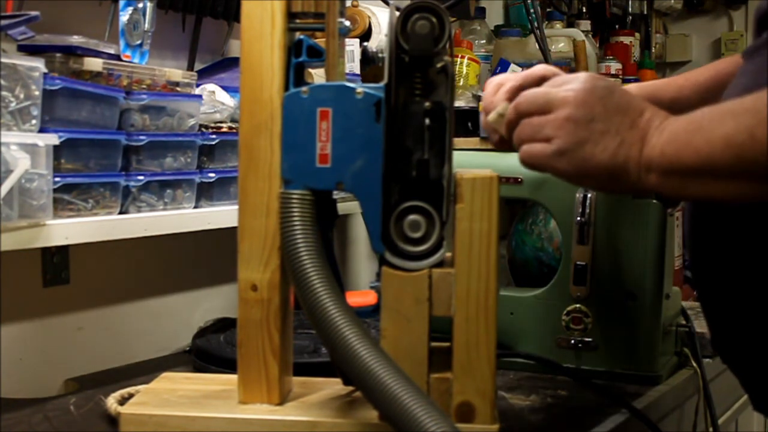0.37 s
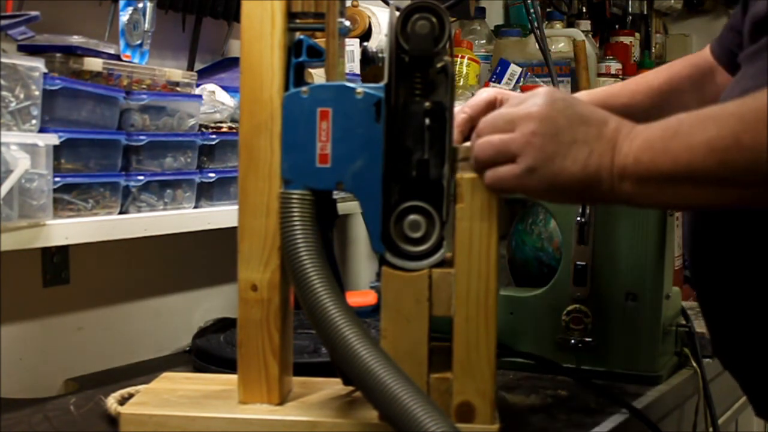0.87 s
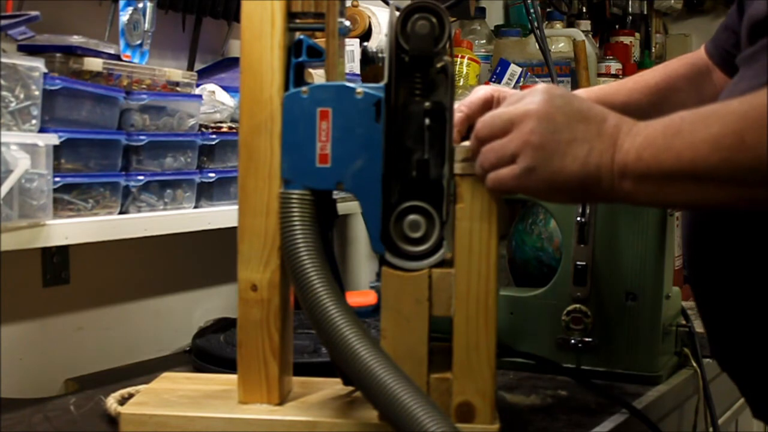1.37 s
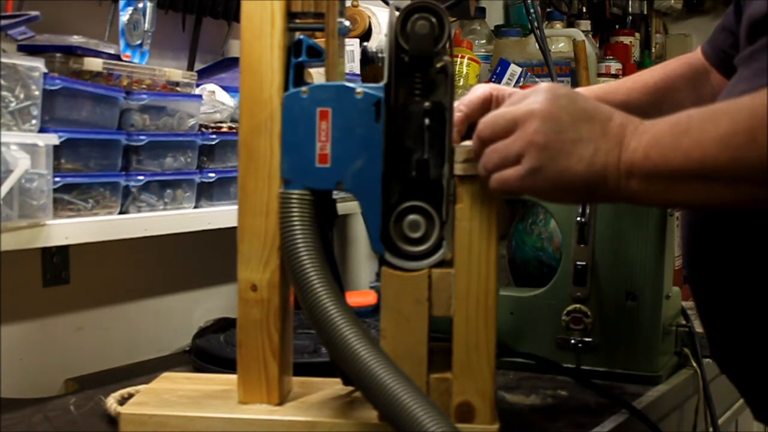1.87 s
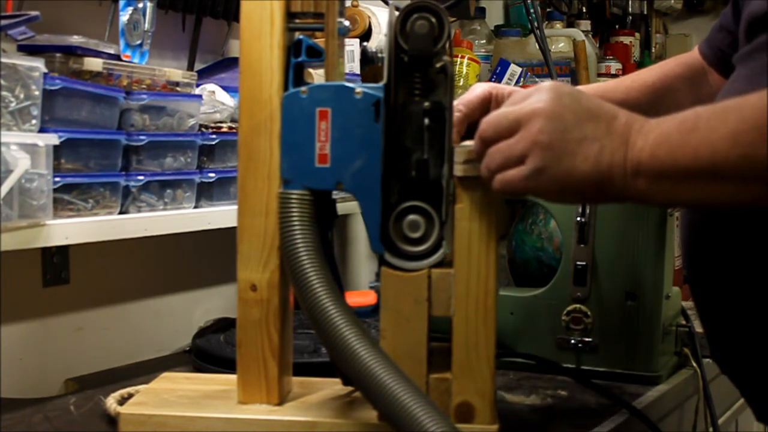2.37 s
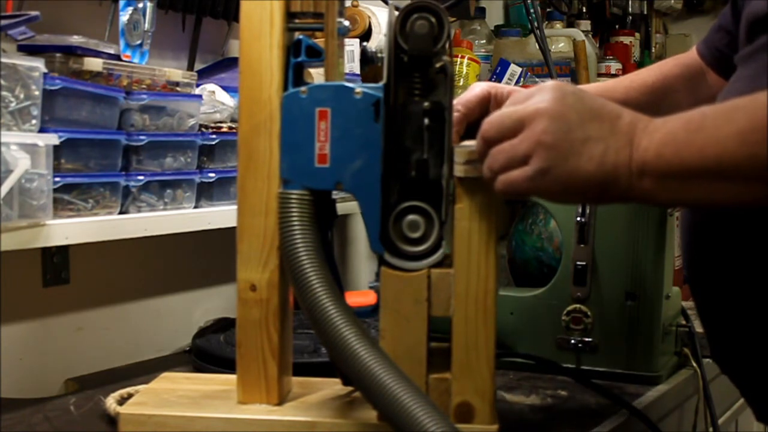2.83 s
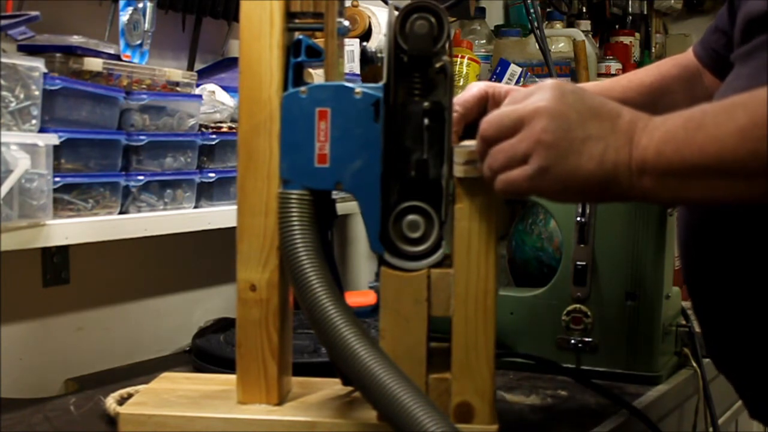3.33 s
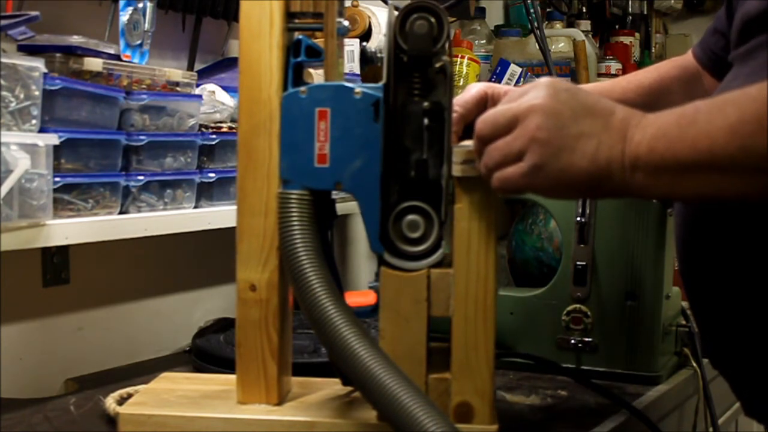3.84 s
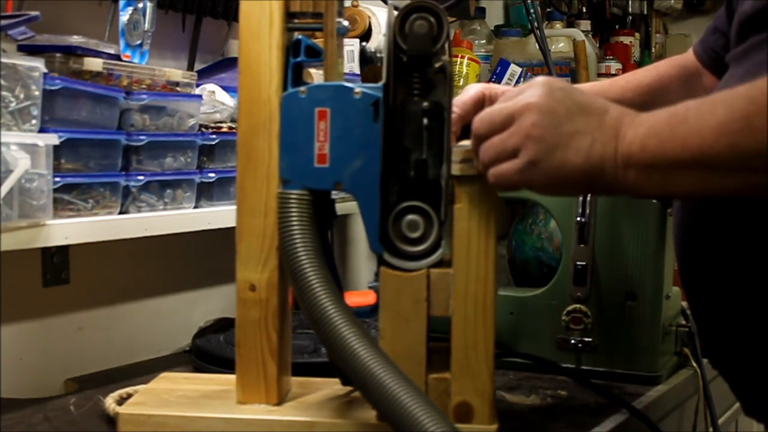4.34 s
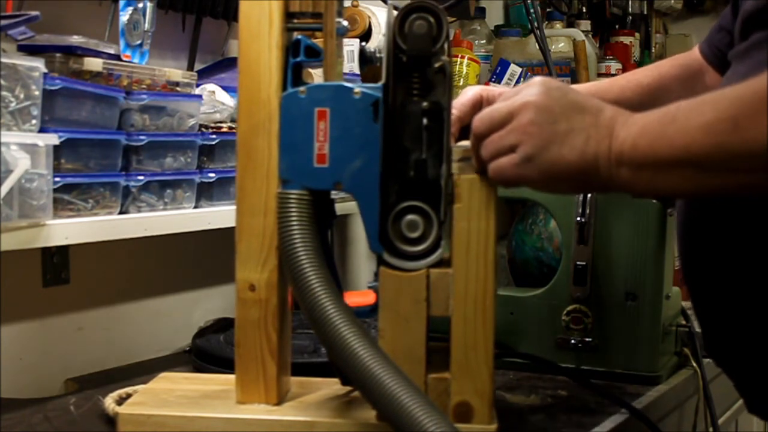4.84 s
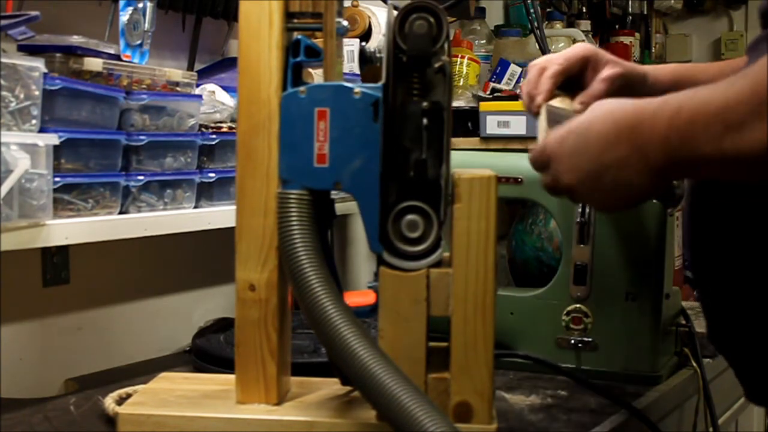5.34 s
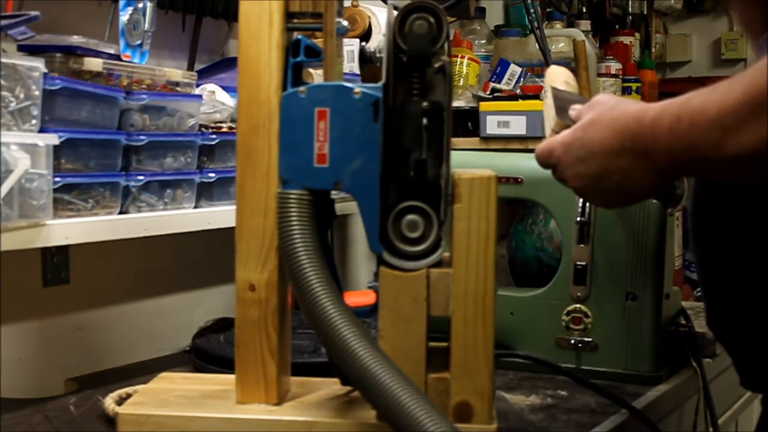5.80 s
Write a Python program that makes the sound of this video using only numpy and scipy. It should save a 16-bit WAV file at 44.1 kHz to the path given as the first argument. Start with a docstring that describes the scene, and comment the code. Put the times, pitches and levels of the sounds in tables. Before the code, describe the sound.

A belt sander is already running at full speed, heard close and centred, the same on both sides. A piercing fan whine a little above 4 kHz, with fainter overtones, gear whirr and pulley hum, sits over a thick, bright rush of cooling air and moving belt. At about 0.9 s a block of wood touches lightly, with a thin, high scratch until about 1.3 s; then a broader gritty rasp grows, and every motor tone slides slightly down. The scratching eases around 3 s and the pitch lifts a touch, then heavier pressing from 3.5 to 4.8 s drags it to its lowest, about six percent below idle, with a faint deep rumble swelling. From about 4.85 s the wood comes away: the rasp fades, and the whine climbs fast, then more gently, back to its free-running pitch by 5.8 s. The machine keeps running to the end.

```python
"""A belt sander clamped upright in a small workshop first runs free: fan whine, gear and pulley tones come from
the turning of its motor, over the rush of cooling air and the belt. A block of wood touches the belt lightly
and scratches high, then is pressed on. The load slows the motor, so all its tones sag together while filtered
noise makes the scratching grit, and a low rumble swells. The wood is lifted and the tones climb back.
Both channels are given the same sound."""
import sys
import numpy as np
from scipy import signal
from scipy.fft import rfft, irfft, next_fast_len
from scipy.io import wavfile
from scipy.ndimage import uniform_filter1d, map_coordinates

SR = 44100
rng = np.random.default_rng(int(sys.argv[2]) if len(sys.argv) > 2 else 0)


def digitize_waveform(pressure):
    """Quantize a signal to 16-bit integers and store it at the path in sys.argv[1].

    Rows of a 2-D input are taken as channels; values are limited to [-1, 1].
    """
    field = np.atleast_2d(pressure).T
    bounded = np.clip(field, -1, 1)
    quanta = np.round(bounded * 32767).astype(np.int16)
    wavfile.write(sys.argv[1], SR, quanta)


def amplitude_ratio(level_db):
    """Convert a level in decibels to the matching linear amplitude (field) ratio."""
    exponent = np.asarray(level_db, float) / 20
    return 10 ** exponent


N = 261950  # length in samples

BLADES = 12  # fan blades, so cycles of the fan tone per motor turn
PULLEY, MESH, WHISTLE = .2837, 5.248, 8.555  # cycles per motor turn at idle


def unit(x):
    """Scales a sound to an rms (average strength) of 1."""
    return x / np.sqrt(np.mean(x ** 2) + 1e-20)


def curves(rows):
    """Joins the rows by straight lines: one value per sample for each column after the time in seconds."""
    s, *columns = np.transpose(rows)
    return [np.interp(np.arange(N) / SR, s, column) for column in columns]


def wobble(rate):
    """A smooth random curve through `rate` random points a second."""
    points = rng.standard_normal(int(N * rate / SR) + 4)
    return map_coordinates(points, [np.arange(N) * rate / SR])


def noise(gain, patchy_db):
    """Noise of rms 1, coloured by a gain per frequency, with slow patches of random level."""
    _, _, cells = signal.stft(rng.standard_normal(N + 2048), SR, nperseg=1024)
    field = uniform_filter1d(rng.standard_normal(cells.shape), size=8, axis=0)  # smooth over frequency
    field = uniform_filter1d(field, size=24, axis=1)  # smooth over time
    patchy = signal.istft(cells * amplitude_ratio(patchy_db * unit(field)), nperseg=1024)[1][:N]
    m = next_fast_len(N)
    spectrum = rfft(patchy, m) * gain(np.fft.rfftfreq(m, 1 / SR))
    return unit(irfft(spectrum, m)[:N])


def tone(turns, order, db, shake):
    """A sine locked to an angle in turns; shake scales a random unsteadiness of its phase, in radians."""
    phase = 2 * np.pi * (order * turns + rng.random()) + shake * wobble(25)
    return np.sqrt(2) * amplitude_ratio(db) * np.sin(phase)


def heard(points, hz):
    """Level in dB of a tone at its present pitch: standing waves make some pitches louder than others."""
    settle_s = .04  # the standing waves need this long to follow a new pitch
    return uniform_filter1d(np.interp(hz, *np.transpose(points)), size=round(settle_s * SR))


def motor_speed():
    """The load slows the motor; the drive belt slips a little, so the pulley side slows slightly more."""
    # Motor speed, given as the pitch of the fan. Each row: time in seconds, fan tone in Hz.
    speed = [(0.0, 4322.1), (0.8, 4326.7), (0.88, 4318.7), (0.96, 4305.7), (1.08, 4274.6), (1.2, 4256.1),
             (1.4, 4236.7), (1.7, 4221.3), (2.0, 4199.8), (2.3, 4170.0), (2.5, 4165.5), (2.62, 4166.5),
             (2.75, 4175.9), (2.95, 4175.4), (3.2, 4189.3), (3.38, 4188.3), (3.55, 4169.9), (4.0, 4103.2),
             (4.25, 4085.7), (4.48, 4048.0), (4.6, 4043.0), (4.78, 4052.5), (4.85, 4076.9), (5.05, 4204.8),
             (5.2, 4258.0), (5.35, 4291.8), (5.6, 4318.1), (5.8, 4329.2), (5.94, 4331.3)]
    idle_hz = 4326  # fan tone without load
    creep = .065  # share of pulley speed lost to slip, per share of motor speed lost
    blade_hz, = curves(speed)
    sag = np.clip(1 - blade_hz / idle_hz, 0, 1)  # share of motor speed lost
    shaft_hz = blade_hz / BLADES
    belt_hz = shaft_hz * (1 - creep * sag)
    return shaft_hz, belt_hz, sag


def fan(shaft_hz, turns):
    """The blades chop the air: a tone at the blade rate and two harmonics above it."""
    # The three tones as heard through the standing waves. Each row: pitch in Hz, level in dB.
    blade_1 = [(4044, -24), (4075, -23.5), (4092, -19.5), (4104, -19), (4118, -22.5), (4134, -19),
               (4148, -24), (4163, -18), (4172, -19), (4178, -23.5), (4184, -29), (4190, -27), (4197, -20),
               (4228, -19.5), (4237, -27), (4248, -19.5), (4270, -18.5), (4291, -33), (4310, -26.5),
               (4328, -22)]
    blade_2 = [(8088, -42.5), (8150, -34.5), (8250, -25.0), (8330, -31.5), (8380, -33.5), (8400, -34.5),
               (8420, -28.5), (8450, -31.0), (8490, -40.5), (8550, -41.5), (8610, -33.0), (8660, -33.0)]
    blade_3 = [(12132, -35.5), (12204, -32.5), (12324, -36.0), (12468, -35.5), (12560, -34.0),
               (12620, -32.5), (12700, -27.0), (12800, -34.0), (12880, -34.0), (12990, -39.5)]
    # Level change of each tone while hands and block move in front of the machine.
    # Each row: time in seconds, change in dB.
    hands_1 = [(0, 1.0), (0.12, 2.0), (0.42, -1.0), (0.65, 2.5), (0.9, 0.0), (4.85, 0.0), (4.95, -1.5),
               (5.05, 0.0), (5.2, -4.0), (5.45, 5.0), (5.62, -2.0), (5.72, -1.0), (5.8, -6.0), (5.94, 2.0)]
    hands_2 = [(0.15, 2), (.5, 4), (.9, 1), (5.2, -1), (5.5, 3.5), (5.7, 1), (5.94, 2)]
    hands_3 = [(0, 2.5), (.2, 6.5), (.5, 1), (.75, 12), (.9, 1), (4.85, -1), (5, -3), (5.5, 7), (5.94, 6)]
    # the last number sets how unsteady the level is, in dB
    blades = [(blade_1, hands_1, .3), (blade_2, hands_2, 1.3), (blade_3, hands_3, 1.8)]
    whine = np.zeros(N)
    for harmonic, (points, hands, unsteady_db) in enumerate(blades, start=1):
        order = harmonic * BLADES
        db = heard(points, order * shaft_hz) + curves(hands)[0]
        db = db + unsteady_db * wobble(9) + 1.13 * wobble(18)
        whine += tone(turns, order, db, shake=0.076)
    return whine


def shaft_and_pulley(shaft_hz, belt_hz, turns, belt_turns):
    """Stronger tones at fixed multiples of the shaft's turning, and others that follow the slipping belt."""
    # Tones of the shaft, then of the belt side. Each key is the cycles per turn.
    # Each row under it: pitch in Hz, level in dB.
    shaft_heard = {1: [(345, -52.5), (355, -51.5), (361, -47)], 2: [(690, -60), (702, -44), (712, -50.5),
                   (721, -46)], WHISTLE: [(2883, -40), (2923, -34), (2940, -50), (2957, -41), (2997, -48),
                   (3026, -38), (3083, -42)], 14: [(4718, -44), (4755, -52), (4830, -36), (4895, -38),
                   (4914, -47), (4998, -39), (5045, -40)]}
    belt_heard = {4 * PULLEY: [(382, -44), (391, -42.5), (404, -40.5), (407, -42), (409, -51)],
                  5 * PULLEY: [(478, -38.5), (485, -43), (489, -56), (496, -49), (504, -40.5), (511, -42)],
                  8 * PULLEY: [(790, -57), (810, -55), (818, -43)], 12 * PULLEY: [(1180, -55), (1210, -46),
                  (1227, -39.5)], 3 * MESH: [(5290, -32), (5340, -44), (5430, -43), (5480, -48),
                  (5530, -40), (5600, -34), (5670, -39)], 13 * PULLEY: [(1242, -42), (1255, -53),
                  (1260, -41), (1282, -36), (1297, -43), (1301, -49), (1328, -36.5)],
                  MESH - PULLEY: [(1670, -59), (1700, -44), (1740, -41), (1770, -38), (1788, -43)]}
    hum = np.zeros(N)
    for order, points in shaft_heard.items():
        db = heard(points, order * shaft_hz) + 1.7 * wobble(6)
        hum += tone(turns, order, db, shake=0.27)
    for order, points in belt_heard.items():
        db = heard(points, order * belt_hz) + .9 * wobble(6)
        hum += tone(belt_turns, order, db, shake=0.12)
    return hum


def gears(belt_hz, sag, turns, belt_turns):
    """Meshing teeth make a tone and its 2nd harmonic; a close neighbour beats with the latter when unloaded."""
    # The mesh tone and its 2nd harmonic as heard. Each row: pitch in Hz, level in dB.
    mesh_1 = [(1760, -28.5), (1775, -30), (1783, -34), (1792, -43), (1800, -34), (1809, -29.5), (1818, -37),
              (1830, -36), (1842, -35), (1852, -45), (1877, -38), (1893, -38.5)]
    mesh_2 = [(3520, -37.5), (3560, -40.0), (3590, -42.0), (3620, -32.5), (3640, -32.5), (3660, -36.0),
              (3680, -29.0), (3700, -31.0), (3720, -33.5), (3765, -31.0), (3788, -32.5)]
    # Level change of the 2nd harmonic, which drops while the freed motor speeds up.
    # Each row: time in seconds, change in dB.
    mesh_2_level = [(0, -1.5), (.4, -8), (.8, -4), (.9, 0.5), (4.85, 0.5), (5.1, -12), (5.25, -6), (5.4, 0),
                    (5.94, 2)]
    # The neighbour tone: cycles per motor turn, level in dB, share of speed lost that silences it.
    flutter = (10.6, -34, .012)
    change_db, = curves(mesh_2_level)
    first_db = heard(mesh_1, MESH * belt_hz) + 1.1 * wobble(7)
    first = tone(belt_turns, MESH, first_db, shake=.15)
    second_db = heard(mesh_2, 2 * MESH * belt_hz) + change_db + 0.89 * wobble(6.5)
    second = tone(belt_turns, 2 * MESH, second_db, shake=.1)
    order, flutter_db, quiet_sag = flutter
    unloaded = np.clip(1 - sag / quiet_sag, 0, 1)
    neighbour = unloaded * tone(turns, order, flutter_db + change_db + 1.5 * wobble(4), shake=.3)
    return first + second + neighbour


def weak_tones(turns, belt_turns):
    """Weaker tones of shaft, pulley and gears that come and go."""
    # Shaft tones. Each entry: cycles per motor turn, level in dB.
    shaft_tones = {8: -50, 13: -55, 28: -50, 42: -54}
    # Pulley tones. Each entry: multiple of the pulley's turning, level in dB.
    pulley_tones = {1: -65.5, 6: -48.5, 7: -51.5, 9: -51, 10: -48, 11: -47.5, 14: -52, 17: -48.5}
    # Mesh tones shifted by pulley turns. Each entry: mesh multiple and pulley turns, level in dB.
    sidebands = {(1, 1): -50, (1, 2): -47.5, (2, -3): -41, (2, -2): -40, (2, -1): -42, (2, 1): -49, (2, 2): -43, (3, -2): -43}
    weak = [(turns, k, db) for k, db in shaft_tones.items()]
    weak += [(belt_turns, k * PULLEY, db) for k, db in pulley_tones.items()]
    weak += [(belt_turns, m * MESH + k * PULLEY, db) for (m, k), db in sidebands.items()]
    return sum(tone(angle, order, db + 3 * wobble(2.48), shake=0.26) for angle, order, db in weak)


def motor():
    """Fan, gears and pulley all follow the one motor, so their tones sag and recover together."""
    shaft_hz, belt_hz, sag = motor_speed()
    turns = np.cumsum(shaft_hz) / SR
    belt_turns = np.cumsum(belt_hz) / SR
    drive = shaft_and_pulley(shaft_hz, belt_hz, turns, belt_turns) + gears(belt_hz, sag, turns, belt_turns)
    return fan(shaft_hz, turns) + drive + weak_tones(turns, belt_turns)


def sanding():
    """Grit scratching the wood excites one broad ring of the block, and a narrower one at first touch."""
    # Strength of the scratching. Each row: time in seconds, level in dB.
    grit = [(0, -50), (.8, -50), (1.1, -41), (1.6, -31), (2.3, -31), (3, -37), (3.6, -32), (4, -27.5),
            (4.7, -28), (4.9, -38), (5.2, -50), (5.94, -50)]
    # Ring of the block: centre in Hz, width in Hz.
    block = (5210, 500)
    # The first light contact sings higher: start in seconds, end in seconds, level in dB, centre in Hz, width in Hz.
    touch = (.93, 1.34, -30, 5600, 90)

    def ring(centre, width):
        return noise(lambda hz: 1 / (1 + (2 * (hz - centre) / width) ** 2), patchy_db=3.0)

    start, end, touch_db, touch_hz, touch_width = touch
    gate = np.interp(np.arange(N) / SR, [start - .02, start, end - .1, end], [0, 1, 1, 0])
    scratching = amplitude_ratio(curves(grit)[0]) * ring(*block)
    return scratching + gate * amplitude_ratio(touch_db) * ring(touch_hz, touch_width)


def roar():
    """Broad rush of cooling air and running belt, coloured by the resonances of housing and bench."""
    # Colour of the rush. Each row: frequency in Hz, relative level in dB.
    air_and_belt = [(15, -73), (25, -49), (169, -17.5), (298, -13.5), (379, -11.5), (434, -8.5), (705, -5),
                    (851, -6.5), (1060, -3), (1760, -2), (2860, -1.5), (5170, -1.5), (8860, -6.5),
                    (12600, -6), (15600, -18)]
    # Resonances of housing and bench. Each row: centre in Hz, width in Hz, lift or dip in dB.
    housing = [(166, 42, 1.5), (1200, 190, -1), (1890, 330, 1.5), (2570, 180, 1.5), (3050, 200, 0.5),
               (3780, 150, 3.5), (4650, 200, 0.5), (5060, 250, 2), (5710, 260, 3), (6200, 250, 3),
               (6870, 300, 0.5), (7930, 230, 3.5), (9500, 370, 2), (10440, 400, 1.5), (10780, 270, 2.5),
               (11400, 250, -1.5), (13750, 350, 4), (14650, 300, 10)]
    roar_db = -18  # level of the whole rush in dB
    corner_hz, corner_db = np.transpose(air_and_belt)

    def colour(hz):
        broad_db = np.interp(np.log(hz + 1), np.log(corner_hz + 1), corner_db)
        bumps_db = sum(db / (1 + (2 * (hz - c) / w) ** 2) for c, w, db in housing)
        return amplitude_ratio(broad_db + bumps_db)

    return amplitude_ratio(roar_db) * noise(colour, patchy_db=0.77)


def rumble():
    """A low rumble, noise in one deep band, that swells during the sanding."""
    # Strength of the rumble. Each row: time in seconds, level in dB.
    bass = [(0, -59), (2.4, -59), (3.2, -54.5), (4.1, -50), (5, -55), (5.94, -51)]
    # Its band: centre in Hz, width in Hz.
    bass_ring = (151, 92)
    centre, width = bass_ring
    band = noise(lambda hz: 1 / (1 + (2 * (hz - centre) / width) ** 4), patchy_db=2.0)
    return amplitude_ratio(curves(bass)[0]) * band


def scene():
    """The machine and the wood, the same on both channels."""
    return np.tile(motor() + sanding() + roar() + rumble(), (2, 1))


def roll_off(x):
    """The treble ends steeply here."""
    return signal.sosfilt(signal.butter(12, 15740, fs=SR, output="sos"), x)


def record(dry):
    """Turns the finished mix into the sound that is saved."""
    return roll_off(dry)


dry = scene()
out = record(dry)
digitize_waveform(out)
```